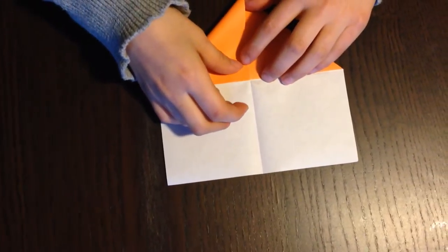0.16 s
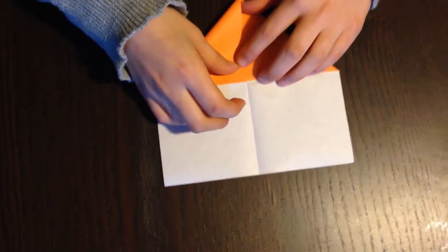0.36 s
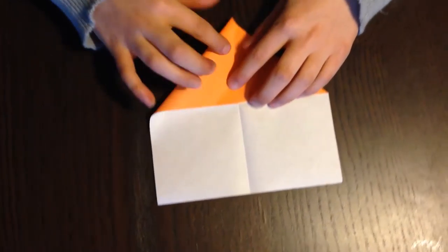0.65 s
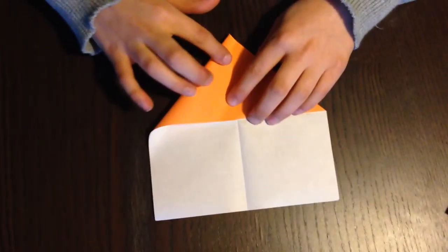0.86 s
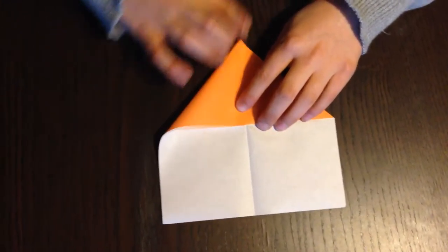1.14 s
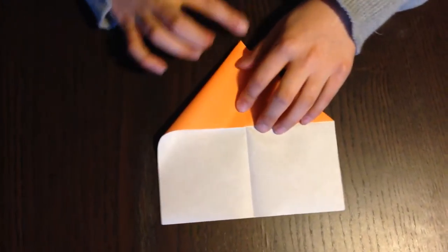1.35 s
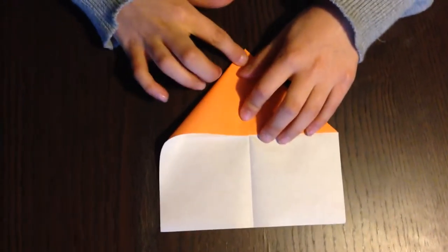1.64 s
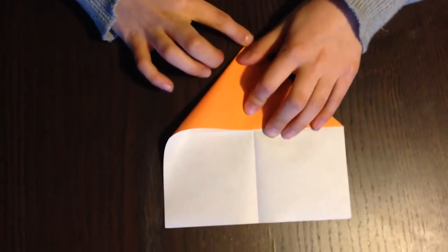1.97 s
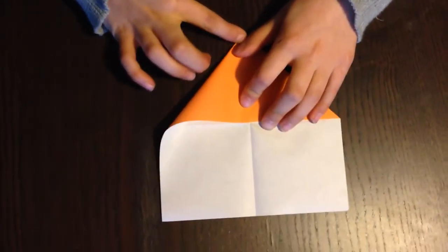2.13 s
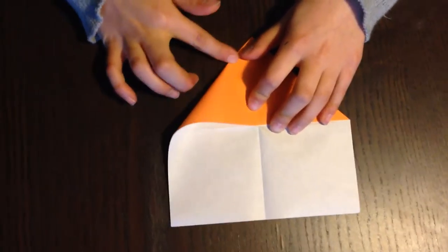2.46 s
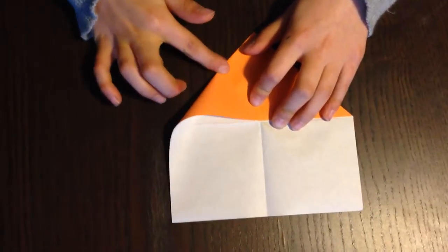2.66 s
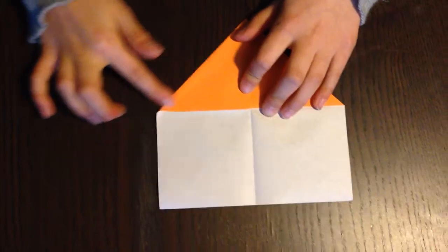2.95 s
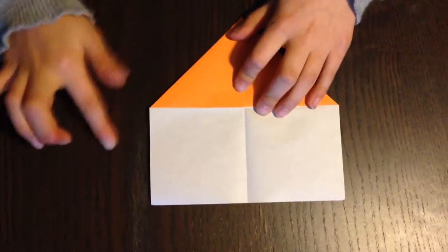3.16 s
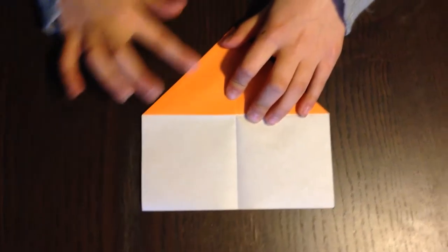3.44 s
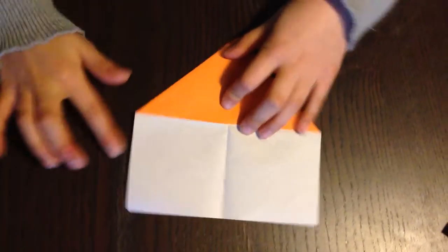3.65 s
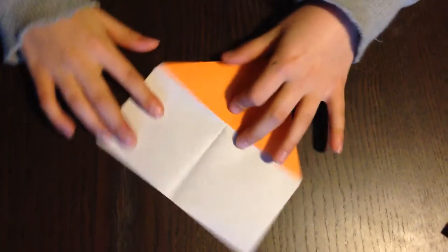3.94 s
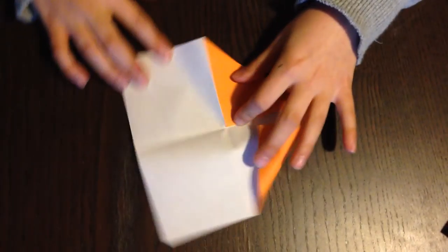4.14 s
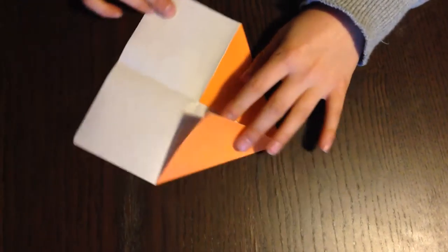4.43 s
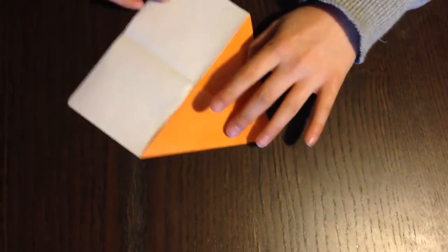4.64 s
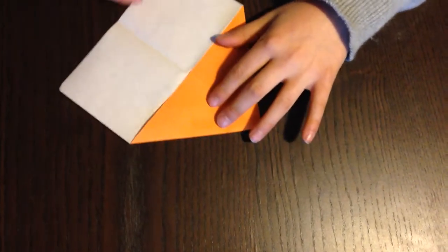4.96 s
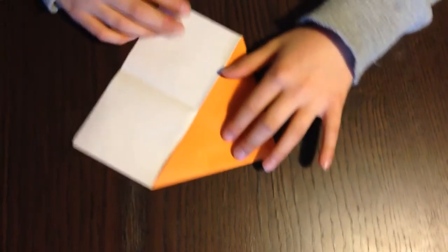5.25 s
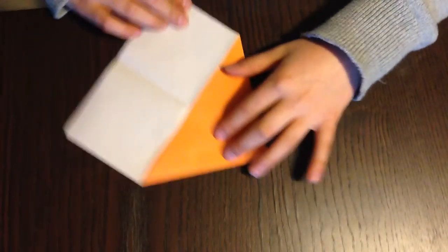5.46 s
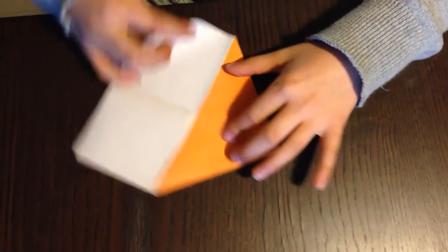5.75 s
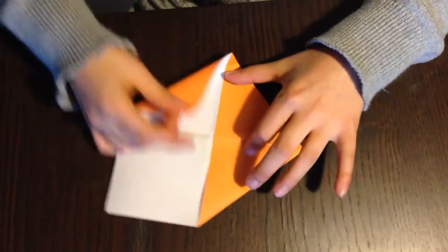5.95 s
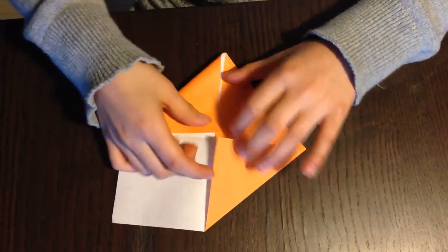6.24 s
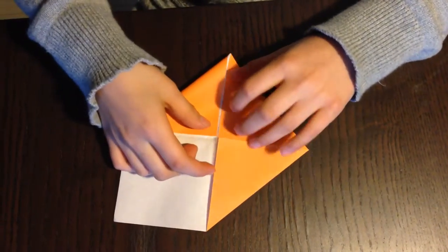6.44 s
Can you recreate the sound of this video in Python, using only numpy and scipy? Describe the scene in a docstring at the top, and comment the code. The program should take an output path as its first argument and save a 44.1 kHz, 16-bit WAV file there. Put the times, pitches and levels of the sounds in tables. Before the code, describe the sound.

A small quiet room with a faint low hum and light hiss, microphone close to hands folding paper on a wooden table. Almost nothing at first, with faint brushing and tiny ticks around 0.5 to 0.75 s. From 1.0 s little crackles lead to a sharp, bright double snap at about 1.2 s, dying quickly. Soft rubbing and a small crackle come at 1.5 s, and light fingertip taps on wood at 1.7 and 2.3 s. Crisp ticks and short rubs run from 2.6 to 3.1 s, then gentle friction and a soft bump near 3.9 s. The main event, from 4.1 to 4.65 s, is a turning sheet rustling loudly with several hard snaps, strongest near 4.3 s. Airy slides follow at 4.7, 5.2 and 5.55 s, with a dull bump at 5.4 s and a fuller swish at 5.85 s. Faint crinkles at 6.3 and 6.5 s end it.

```python
"""A wooden table in a small quiet room, the microphone close to two hands folding a square of paper.
The sheet snaps as it buckles, and a few fingertips click on the table: pulses, then dispersed waves.
Fingers rub the crease and slide the sheet over the wood: shaped noise with ticks, plus gliding resonances.
Hands bump the table softly, ringing its decaying modes; the walls answer with a short tail of noise.
The room hums low under a faint hiss: shaped noise and a narrow wavering drone."""
import sys
import numpy as np
from scipy import signal
from scipy.fft import rfft, irfft, next_fast_len
from scipy.io import wavfile
from scipy.ndimage import uniform_filter1d, map_coordinates

SR = 44100
rng = np.random.default_rng(int(sys.argv[2]) if len(sys.argv) > 2 else 0)


def int16_out(signal):
    """Quantize to a 16-bit WAV file."""
    q = np.round(np.clip(np.atleast_2d(signal).T, -1, 1) * 32767)
    wavfile.write(sys.argv[1], SR, q.astype(np.int16))


N = 291060  # 6.6 s
MILLISECOND = SR / 1000  # in samples


def amp(db):
    """Decibels to gain."""
    return 10 ** (np.asarray(db) / 20)


def unit(x):
    """Scale to rms 1."""
    return x / np.sqrt(np.mean(x ** 2) + 1e-20)


def along(points, hz):
    """Read (Hz, value) points on a log frequency axis."""
    point_hz, values = np.transpose(points)
    return np.interp(np.log(hz + 1), np.log(point_hz + 1), values)


def wobble(rate):
    """A smooth random curve with rate knots a second."""
    knots = rng.standard_normal(int(N * rate / SR) + 4)
    return map_coordinates(knots, [np.arange(N) * rate / SR])


def filtered(x, response):
    """Multiply the spectrum of x by a response of frequency."""
    size = next_fast_len(N + SR // 2)
    hz = np.fft.rfftfreq(size, 1 / SR)
    return irfft(rfft(x, size) * response(hz), size)[:N]


def coloured(x, spectrum):
    """Shape x by a (Hz, dB) spectrum, at rms 1."""
    return unit(filtered(x, lambda hz: amp(along(spectrum, hz))))


def add_at(out, start, sound):
    """Mix a sound into out from a sample index on."""
    out[start:][:len(sound)] += sound


# noise floor of the quiet room: (pitch_hz, relative level_db)
ROOM_FLOOR = [(15, -44), (25, -19), (59, -4), (135, -1.5), (231, -4.5), (293, -9.5), (373, -11.5),
              (404, -9.5), (558, -13.5), (749, -15.5), (1420, -19), (1540, -18.5), (2500, -19), (2930, -18),
              (15000, -20.5)]


def background(floor_db=-66, drone_db=-78, drone_hz=143, drone_width_hz=9):
    """Low room rumble and microphone hiss are shaped noise; a narrow noise band is a faint wavering drone."""
    drone = filtered(rng.standard_normal(N), lambda hz: 1 / (1 + ((hz - drone_hz) / drone_width_hz) ** 2))
    floor = coloured(rng.standard_normal(N), ROOM_FLOOR)
    return amp(floor_db) * floor + amp(drone_db) * unit(drone)


# steady faint floor under the gestures, in the three bands: (brush_db, rustle_db, slide_db)
FAINT_FLOOR_DB = (-93.5, -79.5, -85)
# the bent sheet springs and settles with a short rustle:
# (peak_s, t60_s, brush_db, rustle_db, slide_db, edge treble_db relative to the slide)
SHEET_FLEXES = [(0.747, 0.16, -79, -61, -61, -5), (0.91, 0.46, -90, -67.5, -65, -7),
                (1.165, 0.69, -62, -53, -53, -7), (1.231, 0.16, -49.5, -41.5, -36.5, -4),
                (1.495, 0.49, -65, -63, -66, -5), (1.68, 0.69, -65, -69, -83, -2),
                (1.865, 0.65, -68.5, -66.5, -66, 3.5), (2.627, .3, -58, -58, -51, 1),
                (2.679, 0.31, -55.5, -51, -75, -3), (4.18, 0.32, -48, -39, -43.5, -6),
                (4.26, 0.4, -54, -36, -40, 1), (4.3, 0.33, -44.5, -41, -47.5, 6),
                (4.379, 0.2, -56, -42, -39.5, -9), (4.512, 0.21, -50.5, -51, -67, -6),
                (6.54, 0.18, -59, -75, -75, -3)]
FLEX_ATTACK_S = 0.02  # time to rise by the 18 dB below
# a hand moves over the paper or pushes it across the wood:
# (middle_s, attack_s, hold_s, release_s, brush_db, rustle_db, slide_db, edge treble_db relative to the slide)
HAND_SLIDES = [(0.534, 0.12, .01, 0.077, -76, -68, -65, 1), (1.082, 0.11, 0.095, 0.13, -76, -71, -76, 3),
               (1.487, 0.096, 0.0085, .06, -67, -64, -67, -7),
               (2.373, 0.47, 0.2, 0.17, -70.5, -77, -85, -4), (2.495, 0.12, .01, 0.042, -68, -61, -62, 2),
               (2.822, 0.033, 0.04, 0.052, -56, -49.5, -52, -1),
               (2.961, 0.18, 0.023, 0.16, -63, -62.5, -53.5, 0),
               (3.122, 0.081, 0.034, 0.2, -63, -63.5, -65, -1),
               (3.413, 0.12, 0.042, .08, -69.5, -67.5, -68, -9),
               (3.654, .16, 0.18, 0.15, -63, -66, -62, -2), (3.82, 0.16, 0.0092, 0.17, -66, -61.5, -55, -5),
               (4.027, 0.1, 0.046, 0.1, -66.5, -57.5, -48, -5.5),
               (4.116, 0.066, .02, 0.075, -66, -53, -48.5, -2),
               (4.244, 0.037, .005, .02, -51, -42, -49, -2),
               (4.447, 0.081, 0.026, 0.081, -69, -44.5, -41, -13),
               (4.615, 0.11, .005, 0.032, -57, -44.5, -42, -11),
               (4.74, 0.093, 0.12, 0.074, -70, -61.5, -52, -7),
               (4.897, .06, 0.032, 0.074, -77, -71, -62, -3.5),
               (5.149, 0.043, .01, .05, -65.5, -64, -58.5, -0.5),
               (5.219, 0.075, 0.034, 0.13, -71.5, -61.5, -53, -3),
               (5.445, 0.036, 0.042, .08, -71.5, -61, -54, -3),
               (5.542, 0.082, 0.038, 0.052, -69, -53.5, -43, -6.5),
               (5.601, 0.044, 0.012, 0.024, -63.5, -63, -48, -5.5),
               (5.753, 0.066, .05, .05, -62.5, -64, -56.5, -7),
               (5.832, 0.054, .04, .08, -52, -45, -42.5, -8),
               (5.904, 0.092, 0.018, 0.12, -52.5, -45, -48, -11),
               (6.06, 0.1, 0.081, 0.12, -72, -65.5, -61.5, -6),
               (6.23, 0.11, 0.099, .1, -72, -65, -64, -1.5), (6.319, 0.021, 0.025, 0.11, -61, -61, -64, -3),
               (6.49, 0.12, .04, .08, -74, -70, -72, 3)]
SLIDE_EDGE_DB = -18  # level one attack before the hold, or one release after it
SLIDE_ROUNDNESS = 1.18  # 1 = pointed swell, 2 = round


def gestures():
    """Power of brush, rustle, slide and edge treble: a flex jumps and dies away, a slide swells, holds, fades."""
    t = np.arange(N) / SR
    shapes = []
    for peak, t60, *_ in SHEET_FLEXES:
        rise_db = -SLIDE_EDGE_DB * (t - peak) / FLEX_ATTACK_S
        decay_db = -60 * (t - peak) / t60
        shapes.append(np.minimum(rise_db, decay_db))
    for middle, attack, hold, release, *_ in HAND_SLIDES:
        outside_hold = np.maximum(np.abs(t - middle) - hold / 2, 0)
        outside = outside_hold / np.where(t < middle, attack, release)
        shapes.append(SLIDE_EDGE_DB * outside ** SLIDE_ROUNDNESS)
    # in the faint floor the edge treble has the gain of the slide
    power = np.outer(amp([*FAINT_FLOOR_DB, FAINT_FLOOR_DB[-1]]) ** 2, np.ones(N))
    for shape_db, gesture in zip(shapes, SHEET_FLEXES + HAND_SLIDES):
        brush_db, rustle_db, slide_db, edge_db = gesture[-4:]
        heard = shape_db > -60
        peaks = amp([brush_db, rustle_db, slide_db, slide_db + edge_db])
        power[:, heard] += np.outer(peaks, amp(shape_db[heard])) ** 2
    return power


def friction(spectrum, catch_rate, catch_share, scatter_db):
    """Countless fibres slip as a smooth hiss; now and then a few catch and let go as tiny ticks."""
    caught = rng.random(N) < catch_rate / SR
    signs = rng.choice([-1, 1], N)
    strengths = amp(scatter_db * np.clip(rng.standard_normal(N), -2, 2))
    ticks = unit(caught * signs * strengths)
    hiss = rng.standard_normal(N)
    return coloured(np.sqrt(1 - catch_share) * hiss + np.sqrt(catch_share) * ticks, spectrum)


# spectra of fingers brushing, the sheet rustling and paper sliding: (pitch_hz, relative level_db)
BRUSH_SPECTRUM = [(150, -27), (400, -15), (630, -12), (950, -13.5), (1400, -7), (1900, -6), (2450, -7),
                  (3500, -19.5)]
RUSTLE_SPECTRUM = [(1500, -65), (2400, -18.5), (3000, -3.5), (3300, -4.5), (3800, -3), (4100, -2),
                   (4500, -2.5), (5600, -6.5), (7000, -15), (12000, -51.5)]
SLIDE_SPECTRUM = [(3000, -39), (5000, -5.5), (6200, -5.5), (7500, -3), (9000, -5.5), (10200, -5),
                  (13000, -7), (15500, -13)]


def rubbing(gains, uneven_db=1.94, treble_hz=9500):
    """Fingers brush the paper, the sheet flexes and slides; all three follow the uneven push of the hand."""
    brush_gain, rustle_gain, slide_gain, edge_gain = gains
    brush = brush_gain * friction(BRUSH_SPECTRUM, catch_rate=350, catch_share=0.11, scatter_db=2.5)
    rustle = rustle_gain * friction(RUSTLE_SPECTRUM, catch_rate=500, catch_share=0.3, scatter_db=4.5)
    slide = friction(SLIDE_SPECTRUM, catch_rate=1900, catch_share=0.14, scatter_db=0.5)
    # the edge treble of the slide has a gain of its own
    treble = filtered(slide, lambda hz: 1 - 1 / (1 + (hz / treble_hz) ** 16))
    slide = slide_gain * (slide - treble) + edge_gain * treble
    push = amp(uneven_db * wobble(55))
    return (brush + rustle + slide) * push


def patchy(x, depth_db=1.83):
    """The sheet changes shape as it moves, so its resonances come and go."""
    spectrogram = signal.stft(x, nperseg=512)[2]
    field = rng.standard_normal(spectrogram.shape)
    field = uniform_filter1d(field, size=4, axis=0)  # smooth over pitch
    field = uniform_filter1d(field, size=12, axis=1)  # smooth over time
    return signal.istft(spectrogram * amp(depth_db * unit(field)), nperseg=512)[1][:N]


# decay of the room: (pitch_hz, t60_s)
ROOM_DECAY = [(200, 0.62), (1500, 0.25), (5000, 0.18), (14000, 0.2)]


def room(x, gap_s=0.0044):
    """The walls answer after a short gap with a tail of decaying noise; the bass lingers longest."""
    hz, t, noise = signal.stft(rng.standard_normal(SR // 2), SR, nperseg=256)
    decay = amp(-60 * t / along(ROOM_DECAY, hz)[:, None])
    tail = signal.istft(noise * decay, SR, nperseg=256)[1]
    tail = np.pad(tail / np.linalg.norm(tail), (round(gap_s * SR), 0))
    return signal.fftconvolve(x, tail)[:N]


def causal(db):
    """The minimum-phase response for levels on the FFT grid: nothing sounds before the blow."""
    cepstrum = irfft(np.log(amp(db)))
    half = len(cepstrum) // 2
    cepstrum[1:half] *= 2
    cepstrum[half + 1:] = 0
    return np.exp(rfft(cepstrum))


# what the sheet radiates when it snaps: (pitch_hz, level_db)
PAPER_RADIATION = [(100, -40), (450, -30.5), (750, -12.5), (1100, -4), (1450, 2), (2000, 2), (2400, -2.5),
                   (3000, 3.5), (4400, 0.5), (7300, 5.5), (10500, 1), (15000, -3)]


def snap(body_db, edge_db, flutter_db, pitch_hz, flutter_t60=0.014, linger_t60=0.027, linger_db=-20,
         ring_db=10.5, ring_octaves=0.16, spread=0.0273, size=4096):
    """One snap or click, of energy 1: a sharp pulse and flutter, spread out as by bending waves in a sheet."""
    t, hz = np.arange(size) / SR, np.fft.rfftfreq(size, 1 / SR)
    decay = amp(-60 * t / flutter_t60) + amp(linger_db - 60 * t / linger_t60)
    flutter = rng.standard_normal(size) * decay
    motion = amp(flutter_db) * flutter / np.linalg.norm(flutter)
    motion[0] = 1  # the pulse
    # a wide patch of paper gives body, a tight kink gives a bright edge
    tilt = along([(1900, body_db), (2900, 0.022), (4000, 0), (7300, edge_db)], hz)
    # the patch rings for a few cycles
    ring = ring_db / (1 + (np.log2((hz + 1) / pitch_hz) / ring_octaves) ** 2)
    colour = causal(along(PAPER_RADIATION, hz) + tilt + ring)
    # bending waves carry the treble faster than the bass
    dispersion = np.exp(-1j * spread * 2 * np.pi * np.sqrt(hz))
    sound = irfft(rfft(motion) * colour * dispersion)
    return sound / np.linalg.norm(sound)


CRINKLES_PER_S = 22
CRINKLE_DB, CRINKLE_SCATTER_DB = -2, -0.5  # level over the rustle (over 1 ms), random spread


def crinkles(rustle_gain, body_db=-12, edge_db=-8, flutter_db=2, pitch_hz=3700, pitch_octaves=0.63, count=400):
    """Tiny buckles come at random, the stronger the more the sheet rustles."""
    out = np.zeros(N + SR)
    starts = np.cumsum(rng.exponential(size=count)) * SR / CRINKLES_PER_S
    starts = starts[starts < N].astype(int)
    chance = np.clip(rng.standard_normal((count, 2)), -2, 2)
    for start, (strength, pitch) in zip(starts, chance):
        sound = snap(body_db, edge_db, flutter_db, pitch_hz * 2 ** (pitch_octaves * pitch))
        gain = rustle_gain[start] * amp(CRINKLE_DB + CRINKLE_SCATTER_DB * strength)
        add_at(out, start, gain * np.sqrt(MILLISECOND) * sound)
    return out[:N]


# sharp snaps of the sheet, and the clicks of fingertips touching the table at 1.668, 2.338 and 4.511 s:
# (start_s, level_db over 1 ms, body_db, edge_db, flutter_db relative to the pulse, pitch_hz of the ring)
SNAPS_AND_CLICKS = [(0.5158,-52,-3,-10,7,3120), (0.546,-42.5,2.5,-24,17,1530),
                    (0.7368,-46.5,0.5,-19,-13,2920), (1.013,-42.5,-21,-7,-4,12580),
                    (1.0225,-37.5,-22,2,4,4030), (1.0356,-38,-9,-2,14,3420), (1.0435,-37.5,-19,-12,-2,3520),
                    (1.0873,-37,-17,-8.5,2,3350), (1.13,-43.5,-23,-2,5,3600),
                    (1.1575,-19.5,-10.5,-6.5,-0.5,4050), (1.2234,-25.5,-2,-4,9,2950),
                    (1.2277,-18.5,-17.5,-2,-9,3750), (1.229,-13.8,-22,-2.5,-5,7450),
                    (1.2308,-32,-17.5,-7.2,8.5,7050), (1.4797,-40.5,-20,-3,-8,3720),
                    (1.489,-36.5,-11,-3,7,11500), (1.4993,-30,-12.5,-8.5,-2,3740),
                    (1.668,-35.5,0,-16.5,27,3600), (1.8598,-51,-3,-14,-2,4190), (2.3378,-47.5,9,-3,-5,1650),
                    (2.616,-31.5,0,-5,7,9300), (2.6745,-27,-6.5,-6,23,9750),
                    (2.7005,-30.5,-10,-10.5,27,4680), (2.7696,-28,-9,-8,2,10000),
                    (2.7878,-37,-11,-12,15,10550), (3.0923,-34.5,-4,-4,-2,10300), (3.887,-46,7,-23,1,3400),
                    (3.9145,-48,-11,-3,-5,11000), (3.9183,-39,-7,-12.5,6,7350),
                    (4.0916,-30.5,2,-10,19,3680), (4.1731,-26.5,-3,-14.5,11,5300),
                    (4.1814,-29.5,3.5,-14,12,3900), (4.256,-16.5,0.5,-10.5,-0.5,2000),
                    (4.2826,-15,-10.5,-14,6,7300), (4.289,-15,-2,-7,18,3350), (4.3022,-26,-10,-12,8,4260),
                    (4.3683,-30.5,-12,-14,7,4190), (4.3727,-24,-5.5,-1,10,3560),
                    (4.511,-32.5,-3,-22,0,2870), (4.6211,-33.5,-0.5,-8,21,4780),
                    (5.7604,-40.5,6,-10,15,4350), (6.2513,-44.5,-13,-9,1,2880),
                    (6.3031,-36.5,-5,-13.5,8,2950), (6.3065,-39.5,3,-8,19,4280),
                    (6.3309,-40.5,1,-17,13,3370), (6.527,-33.5,-3,-10.5,27,4940), (6.55,-41.5,1,-4,-1,5200)]


def snaps_and_clicks():
    """Each snap of the sheet or fingertip click on the table has its own strength, colour and ring."""
    out = np.zeros(N + SR)
    for start_s, level_db, body_db, edge_db, flutter_db, pitch_hz in SNAPS_AND_CLICKS:
        sound = snap(body_db, edge_db, flutter_db, pitch_hz)
        add_at(out, round(start_s * SR), amp(level_db) * np.sqrt(MILLISECOND) * sound)
    return out[:N]


# a stroke rings one patch of the paper or, low down, the table under it:
# (middle_s, half_s: a quarter of the whole fade in and out, level_db before that fade, pitch_hz at the middle)
RINGING_STROKES = [(1.258, .045, -56.5, 2030), (2.49, .038, -61.5, 9270), (2.82, .04, -68, 4200),
                   (2.965, .045, -63.5, 851), (3.138, .06, -59, 1656), (3.135, .05, -59.5, 2490),
                   (4.205, .043, -47, 2070), (4.283, .04, -47.5, 1496), (4.306, .055, -43, 3255),
                   (4.446, .05, -46, 4470), (4.601, .04, -52, 4620), (4.735, .09, -59, 5120),
                   (5.216, .09, -57, 8260), (5.475, .06, -64.5, 120.2), (5.55, .043, -59, 7500),
                   (5.597, 0.026, -66.5, 560), (5.774, .05, -59, 1740), (5.848, .1, -68, 631),
                   (5.851, .09, -64.5, 140), (5.927, .061, -53, 2590)]
STROKE_GLIDE = 0.05  # pitch rises from this share below the middle pitch to as much above
STROKE_WIDTH_HZ, STROKE_WIDTH_GROWS = 144, 0.51  # half width at 1 kHz; power by which it grows with pitch


def strokes():
    """Friction drives one resonance; it glides as the finger changes the length of the patch."""
    out = np.zeros(N + SR)
    for middle_s, half_s, level_db, pitch_hz in RINGING_STROKES:
        size = round(4 * half_s * SR)
        width_hz = STROKE_WIDTH_HZ * (pitch_hz / 1000) ** STROKE_WIDTH_GROWS
        glide_hz = pitch_hz * (1 + STROKE_GLIDE * np.linspace(-1, 1, size))
        phase = 2 * np.pi * np.cumsum(glide_hz) / SR
        # slow noise on both quadratures makes a noise band around the pitch
        lowpass = signal.butter(2, width_hz, fs=SR, output="sos")
        grip = signal.sosfilt(lowpass, rng.standard_normal((2, size)))
        ring = unit(grip[0] * np.cos(phase) + grip[1] * np.sin(phase))
        add_at(out, round((middle_s - 2 * half_s) * SR), amp(level_db) * np.hanning(size) ** 2 * ring)
    return out[:N]


# a hand or fingertip lands on the table:
# (start_s, level_db, t60_s at 112 Hz, hardness_hz above which modes are woken less)
TABLE_BUMPS = [(1.6669, -46.5, 0.19, 1510), (2.339, -43.5, 0.11, 1800), (3.9205, -41.5, 0.064, 159),
               (4.513, -51, 0.12, 1410), (5.405, -47.5, 0.082, 159), (5.425, -61, 0.11, 168)]
# modes of the table top: (pitch_hz, relative level_db)
TABLE_MODES = [(75, -23), (112, 1.5), (140, -13), (205, -4), (300, 11), (560, 16), (650, 17.5), (1080, 23),
               (1480, 4), (1750, 9)]


def bumps(attack_s=0.0017, damping=0.77, reference_hz=112):
    """Soft flesh wakes only the lowest modes of the table, a fingertip the higher ones too, which die sooner."""
    out, t = np.zeros(N + SR), np.arange(SR // 2) / SR
    for start_s, level_db, t60, hardness_hz in TABLE_BUMPS:
        woken, modes = [], []
        for hz, mode_db in TABLE_MODES:
            woken.append(amp(mode_db) / (1 + (hz / hardness_hz) ** 4))
            decay = amp(-60 * t / t60 * (hz / reference_hz) ** damping)
            modes.append(np.sin(2 * np.pi * hz * t) * decay)
        ring = np.dot(woken, modes) / np.linalg.norm(woken)
        add_at(out, round(start_s * SR), amp(level_db) * (1 - np.exp(-t / attack_s)) * ring)
    return out[:N]


def scene():
    """Paper and table close by, each with its answer from the walls, over the quiet room."""
    gains = np.sqrt(gestures())
    crackle = snaps_and_clicks() + crinkles(gains[1])
    rub = patchy(rubbing(gains)) + strokes()
    thuds = bumps()
    close = crackle + rub + thuds
    walls = amp(-10.5) * room(crackle) + amp(-12.0) * room(rub) + amp(-10.5) * room(thuds)
    return (close + walls + background())[None]


def record(dry, top_hz=15500):
    """The microphone's band ends in a very steep low-pass."""
    return np.array([filtered(channel, lambda hz: 1 / np.hypot(1, (hz / top_hz) ** 200)) for channel in dry])


dry = scene()
out = record(dry)
int16_out(out)
```